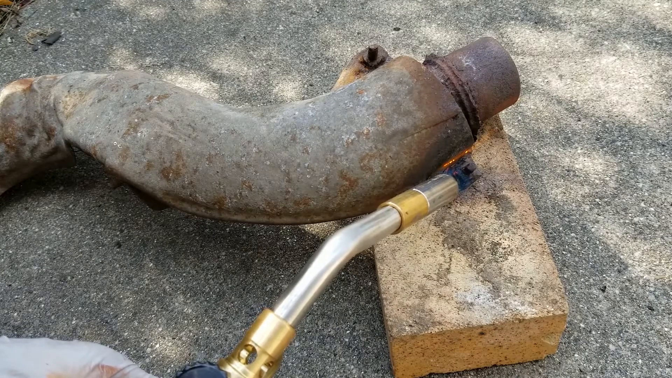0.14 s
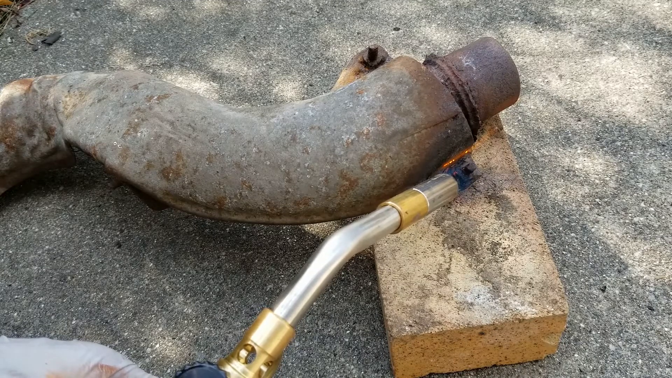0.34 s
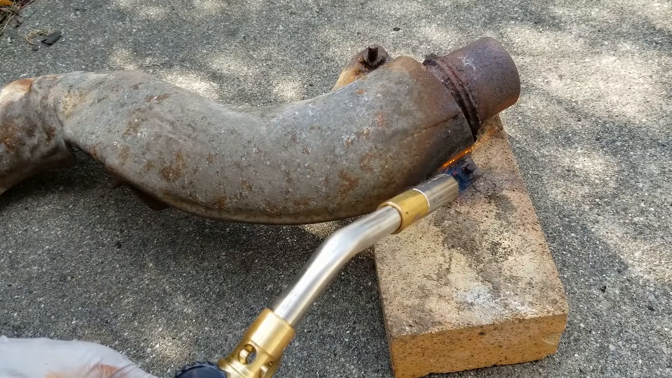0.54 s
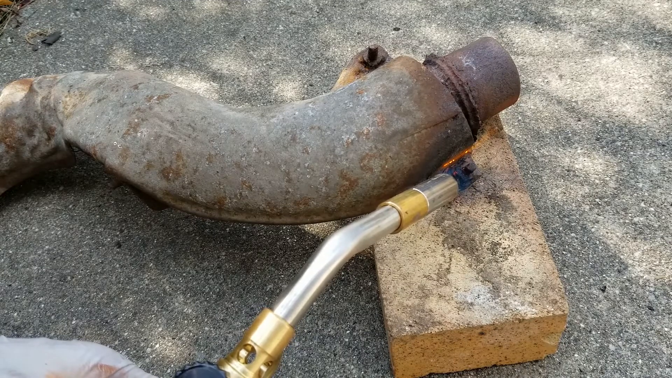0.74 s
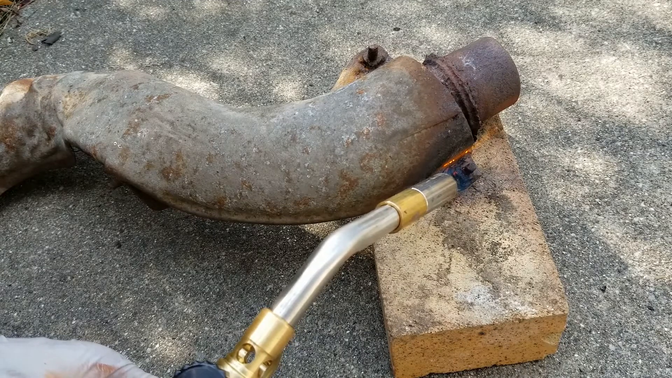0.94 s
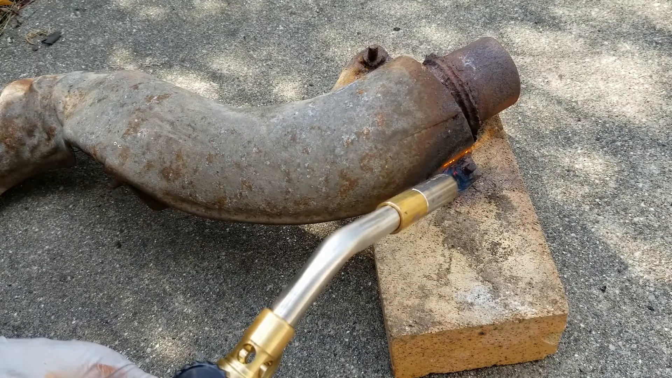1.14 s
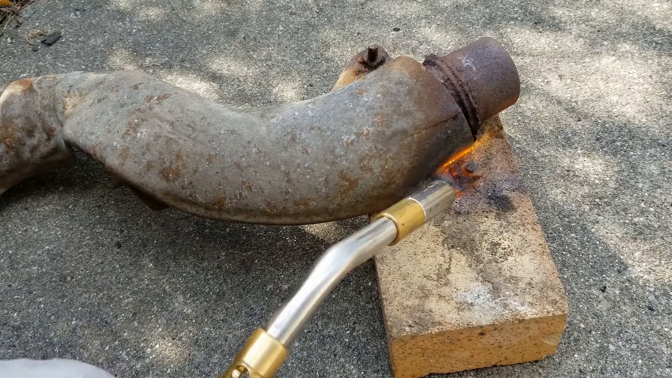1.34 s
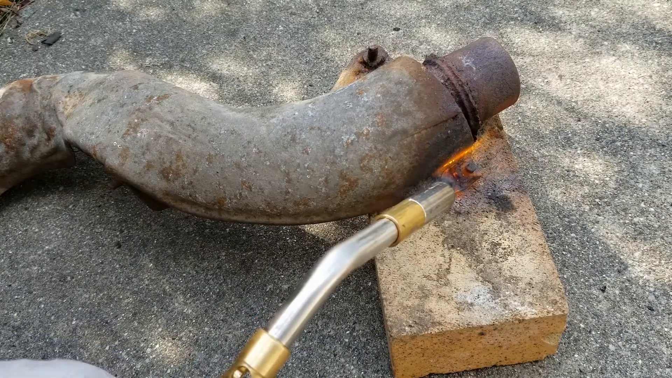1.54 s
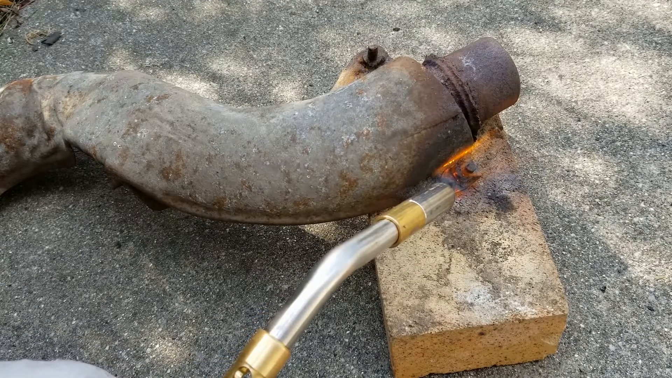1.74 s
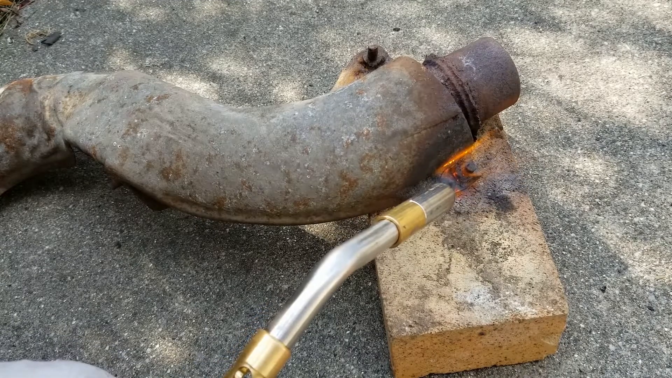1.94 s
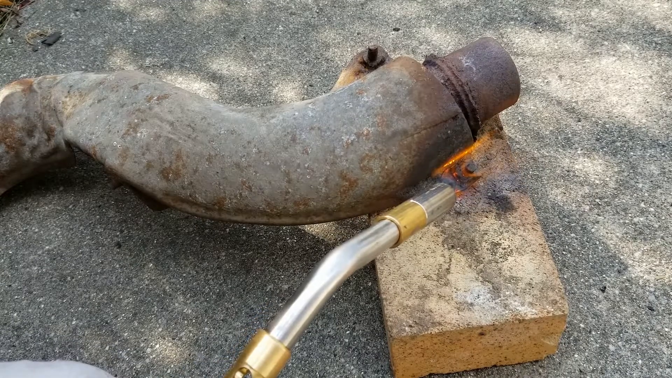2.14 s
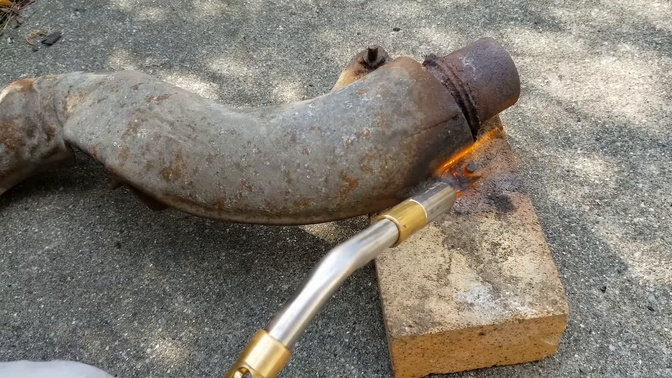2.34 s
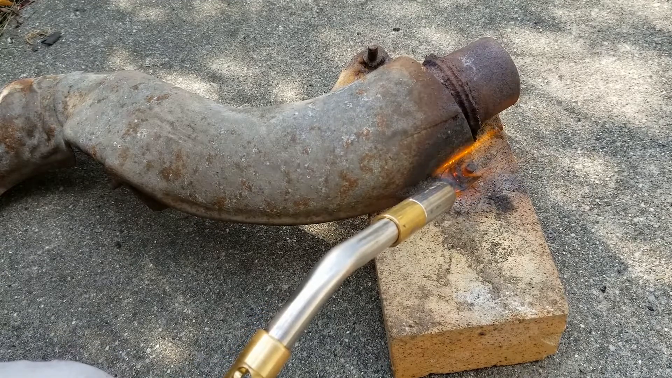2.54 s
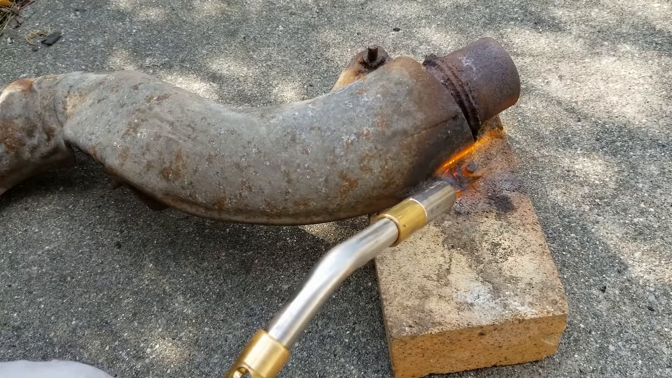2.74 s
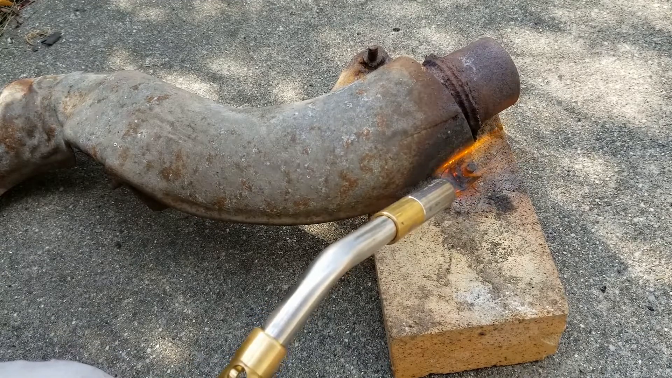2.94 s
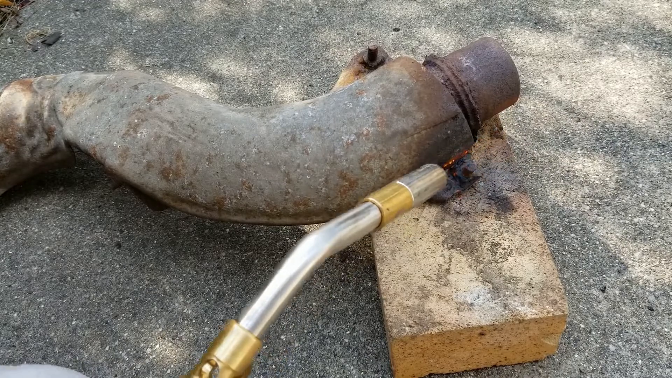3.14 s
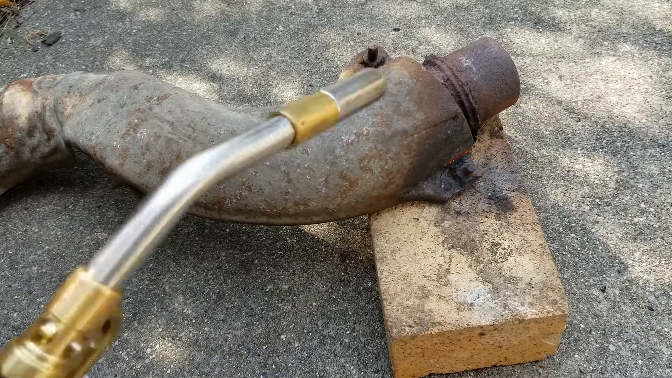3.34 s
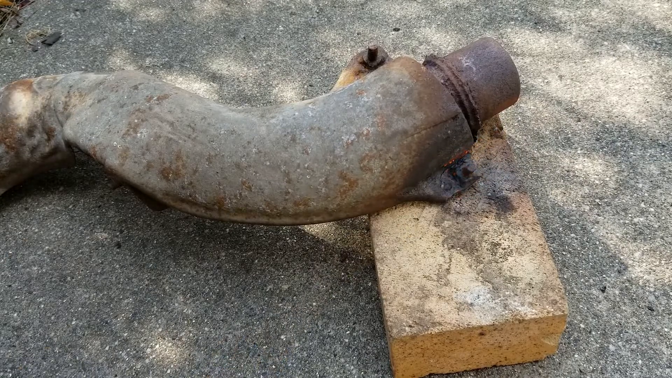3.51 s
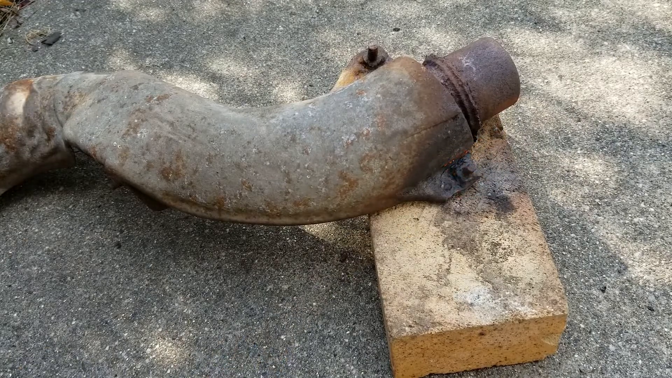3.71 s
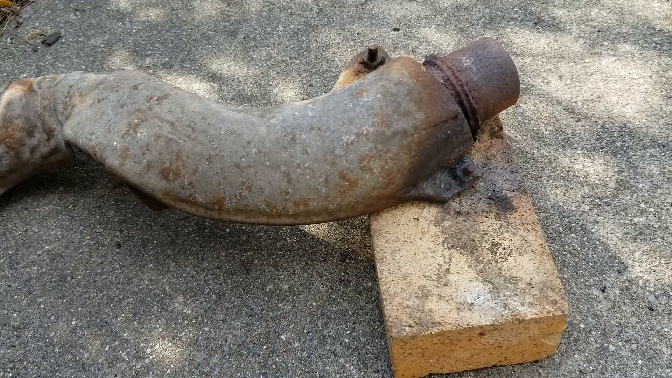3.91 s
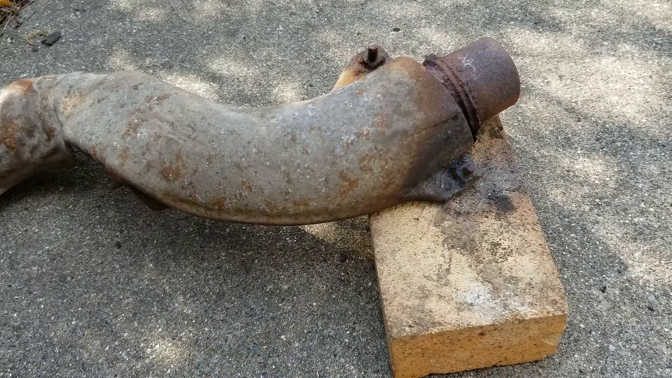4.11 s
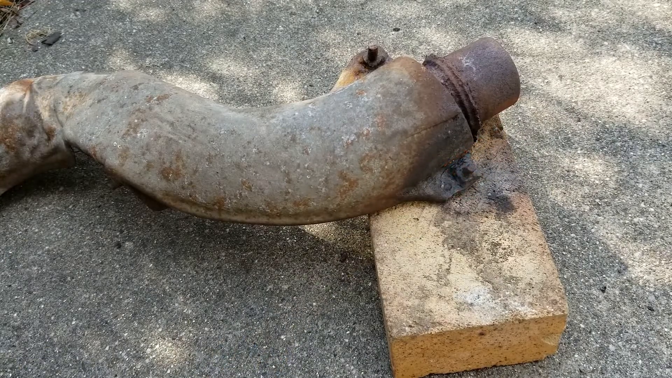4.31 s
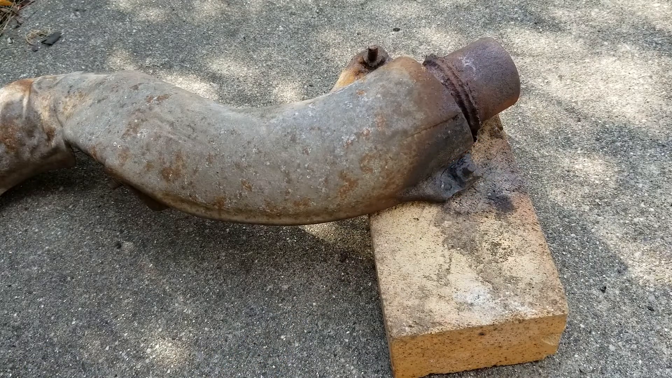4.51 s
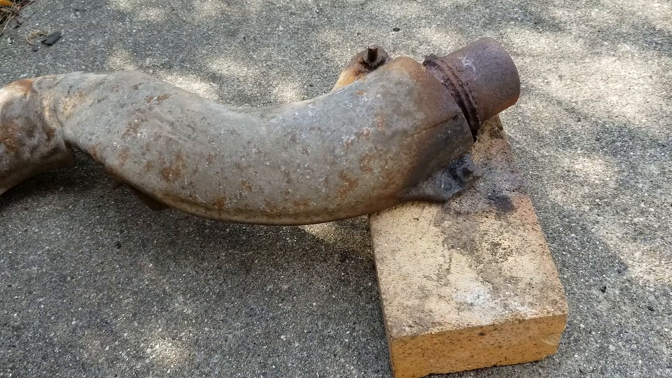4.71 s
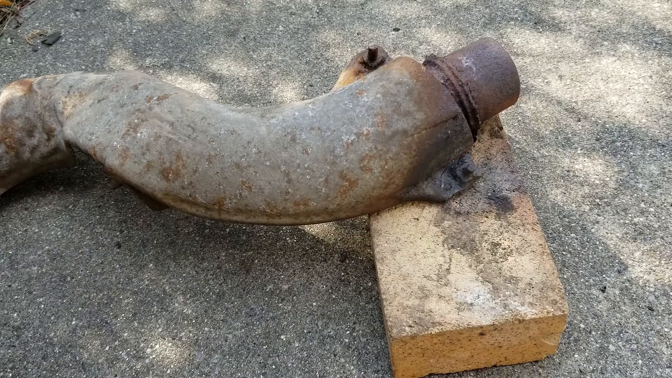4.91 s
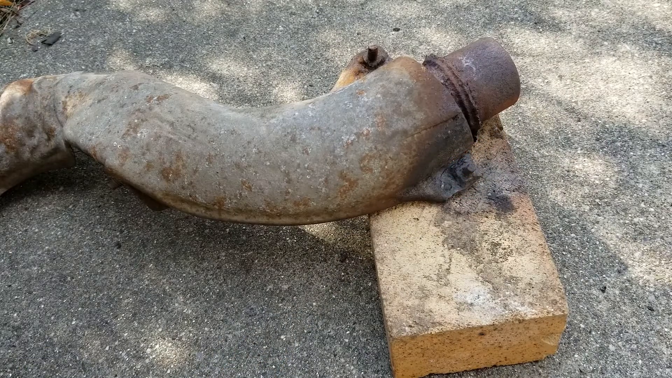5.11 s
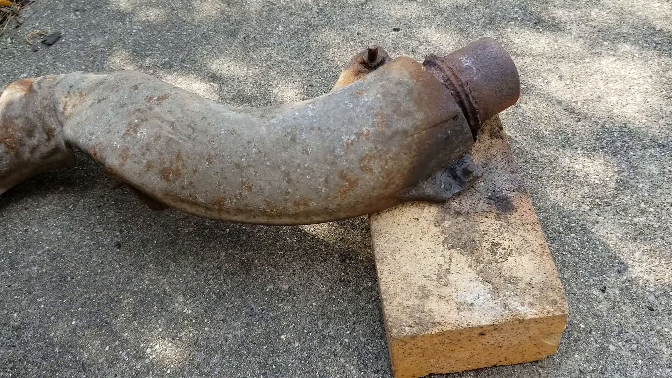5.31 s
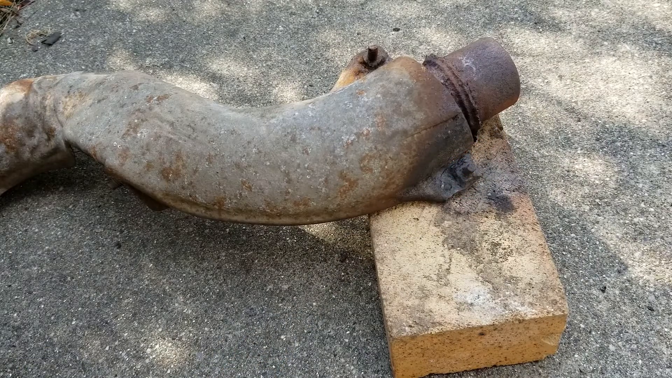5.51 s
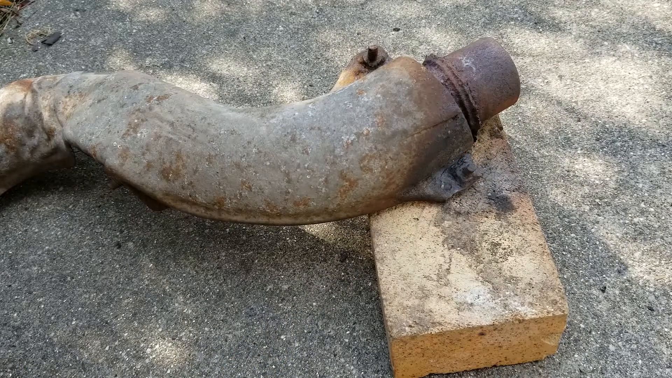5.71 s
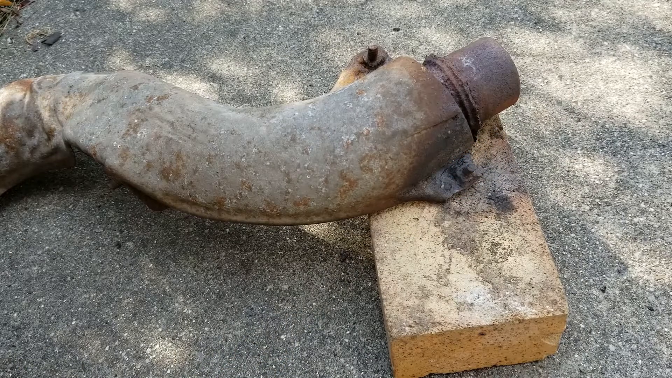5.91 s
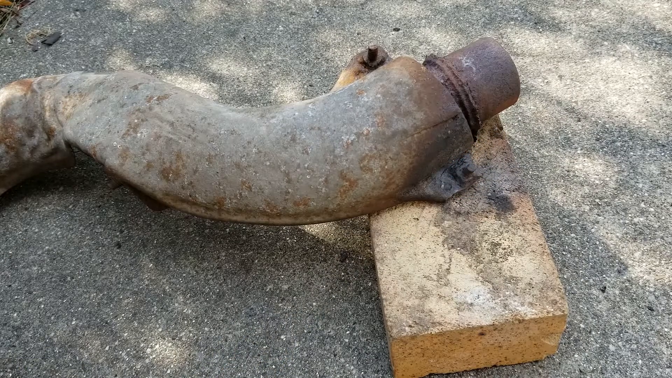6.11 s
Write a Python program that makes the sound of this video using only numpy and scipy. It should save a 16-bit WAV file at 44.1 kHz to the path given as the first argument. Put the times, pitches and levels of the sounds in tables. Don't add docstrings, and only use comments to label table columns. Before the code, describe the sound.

A loud, rushing torch flame fills the first three seconds, wavering slightly as it is moved against metal. It drops away abruptly with a plastic snap, a pop and short fluttering puffs. The sudden quiet of an open yard follows: low far traffic, machine hum, thin chirping insects, a sleeve brushing. Just after five seconds, metal knocks and rattles on concrete, and the background rises slightly toward the end.

```python
import sys
import numpy as np
from scipy import signal
from scipy.fft import rfft, irfft, next_fast_len
from scipy.io import wavfile
from scipy.ndimage import uniform_filter1d, map_coordinates

SR = 44100
rng = np.random.default_rng(int(sys.argv[2]) if len(sys.argv) > 2 else 0)


def field_ratio(decibels):
    return 10 ** (np.asarray(decibels, dtype=float) / 20)


def output_pcm(signal):
    pcm = np.clip(np.atleast_2d(signal).T, -1, 1) * 32767
    wavfile.write(sys.argv[1], SR, np.round(pcm).astype(np.int16))


N = 271207
T = np.arange(N) / SR

# time [s], camera gain [dB], hum [dB].
YARD = [(3.3, 2.5, -55), (3.7, -0.38, -55), (4.1, 1.5, -53.5), (4.45, 0.52, -57), (5.05, 2, -53.5),
        (5.3, 5.5, -51), (5.62, 7, -46), (5.9, 7.5, -45.5), (6.15, 8, -49)]
# frequency [Hz], left [dB], right [dB], likeness of the ports [0-1].
AIR = [(30, -29, -26, 1), (247, -10, -10.5, .9), (501.6, -23, -23, 0.27), (850, -23.5, -25.5, 0.17),
       (1250, -23, -29.5, .4), (1820, -16, -35.5, 0.38), (2340, -31, -38.5, 0.27), (3450, -40.5, -41, .2),
       (4070, -34, -41.5, .1), (6100, -36.5, -29, .3), (7150, -32.5, -38, .6), (10268, -40.5, -41.5, .8),
       (15900, -38, -39, .8)]
# frequency [Hz], lead of the left port [radians].
AIR_LEAD = [(1, 0), (700, 0), (1050, 2.8), (2200, 3.2), (2600, 0), (5300, 0), (5800, 3), (6300, 3),
            (6800, 0)]
# frequency [Hz], left [dB], right [dB], likeness [0-1].
TRAFFIC = [(25.04, -23, -24.5, .85), (49.7, 0, -3, 0.84), (120, 2, 2, 0.975), (209.6, -4, -6.5, 0.942),
           (326, -20.5, -20.5, 0.27), (501, -34.5, -34.5, .5)]
# time [s], level [dB], length [s].
GUSTS = [(.9, -52.5, 0.048), (2.12, -44.5, 0.042), (2.249, -41.5, .05), (2.78, -52.5, 0.056),
         (3.17, -45, 0.032), (3.43, -54.5, 0.047), (4.11, -57, 0.038), (4.78, -61.5, 0.0306),
         (5.629, -48.5, .04), (5.9, -49.5, 0.037), (5.96, -53.5, .06), (6.04, -56.5, 0.04),
         (6.13, -56, 0.039)]
# frequency [Hz], width [Hz], level [dB].
HUM = [(57.6, 22, 0.5), (119, 14, -7)]
# start [s], end [s], frequency [Hz], unsteadiness [Hz], level [dB].
WHINES = [(3.33, 3.78, 296, 9, -64.5), (4.75, 5.05, 297, 6, -70), (5.46, 5.62, 405, 25, -66),
          (5.7, 6.05, 412, 30, -66), (5.08, 5.26, 894, 16, -74), (5.33, 5.58, 894, 16, -72),
          (5.65, 5.9, 894, 12, -74), (5.37, 5.48, 1620, 150, -65), (4.6, 6.15, 6115, 9, -82),
          (3.4, 3.9, 6300, 40, -88), (4.4, 5.6, 7800, 20, -82), (4.2, 5.1, 7200, 6, -86),
          (5.52, 5.97, 9480, 60, -78), (5.5, 6.15, 8650, 80, -77), (4.45, 4.95, 6950, 10, -87),
          (4.8, 5.05, 11300, 700, -78), (3.98, 4.3, 11250, 1200, -79), (5.97, 6.15, 11000, 2000, -73)]
# frequency [Hz], left [dB], right [dB], likeness [0-1].
CHORUS = [(7500, -29.5, -26, .5), (8100, -10.5, -1.5, 0.49), (8790, -14.5, -0.5, .5), (9430, -13.5, -5, .4),
          (9868, -35, -28.5, 0.42)]
CHIRPS = [3.38, 3.62, 3.88, 4.075, 4.345, 4.61, 4.89, 5.16, 5.435, 5.715, 5.99]
# time [s], frequency [Hz], level [dB], length [s].
NEIGHBOURS = [(3.5, 8150, -75, .03), (3.61, 8814, -71.5, 0.041), (3.72, 9350, -80.5, .04),
              (3.841, 8906, -70, 0.11), (3.85, 9500, -75.5, .05), (4.08, 8900, -66, 0.061),
              (4.17, 9200, -71.5, .06), (4.24, 8300, -71.5, .05), (4.44, 8750, -71, 0.085),
              (4.61, 9430, -73, .05), (4.677, 8785, -71, 0.059), (4.73, 8670, -73.5, .06),
              (4.882, 8780, -74, 0.062), (4.92, 9500, -76.5, 0.031), (5.06, 9500, -76, 0.031),
              (5.341, 8240, -73.5, .06), (5.39, 8800, -74.5, 0.039), (5.54, 9500, -72.5, 0.031),
              (5.584, 8750, -67.5, 0.137), (5.6, 8070, -70.5, 0.065), (5.68, 9520, -70, .05),
              (5.779, 8570, -66.5, 0.051), (5.82, 9360, -67.5, .06), (5.93, 8080, -69.5, .05),
              (5.95, 8760, -65.5, 0.082), (6.0, 9300, -66, .05), (6.079, 8520, -66.5, .06)]
# peak time [s], level [dB], time to fall 18 dB [s].
RUSTLE = [(3.41, -64, 0.14), (3.916, -69.5, 0.06), (4.074, -62.5, 0.24), (4.12, -67, 0.23),
          (4.22, -71.5, 0.56), (4.3, -78.5, 0.17), (5.118, -78, 1.47), (5.39, -74.5, 0.12),
          (5.74, -79, 0.36), (6.04, -64, 1.5)]
# frequency [Hz], left [dB], right [dB], likeness [0-1].
CLOTH = [(1500, -30.5, -34.5, 0.303), (3000, -16.5, -22.5, 0.313), (7000, -15, -16, .4),
         (10320, -6, -11, 0.7042), (11300, -3.5, -11.5, 0.57), (13000, -6, -10.5, .7),
         (15800, -5.5, -17.5, .7)]
# time [s], peak [dB], brightness [dB], scattered tail [dB], ring length [0-1.5].
CLICKS = [(4.0544, -57, -2, 7.5, 0.65), (4.4244, -59, -4.5, -11.5, .5), (5.111, -35, -24, -1, .65),
          (5.1485, -52, -18, -1, 0.63), (5.1897, -31, -8.5, -4, 0.72), (5.2040, -43, -10.5, -2.5, .9),
          (5.2085, -50.5, 5.5, -1.5, 1.1), (5.236, -52, -7.5, -3, .7), (5.1255, -47, -20, -4, 0.68),
          (5.222, -48.5, -5, -2, 0.81), (5.3853, -47, -9.5, -3.5, 0.37)]
# time [s], peak [dB], brightness [dB], tail [dB], ring length [0-1.5].
TICKS = [
    (3.4594, -59.5, 1, -4.5, 0.493),
    (5.2703, -43, -12.5, 3, 0.48),
    (5.4048, -45, -1.5, -9.5, 0.255),
]
# time [s], peak [dB], brightness [dB], tail [dB], ring length [0-1.5].
SNAPS = [
    (3.2004, -28.5, -16.5, -12, 0.41),
    (3.2018, -35.5, 0, -10, 0.52),
]
# time [s], peak [dB], brightness [dB], tail [dB], ring length [0-1.5].
POP = [
    (3.2538, -37, -9, -10.5, 1.02),
]
# frequency [Hz], level [dB], 60 dB decay [s].
BODY = [(1520, -13, 0.063), (1741, 2, 0.0215), (2013, 2, 0.0237), (2390, -1.5, 0.018), (2869, -9, 0.0177),
        (3620, -16.5, 0.0065)]
# frequency [Hz], level [dB], 60 dB decay [s].
BRASS = [(4440, -3, 0.0124), (5780, -3.5, 0.0102), (6770, -2, 0.048), (8280, 0.5, 0.0215),
         (10370, -4, 0.031), (11880, -5.5, 0.031), (13900, -7, 0.0196), (15400, -4.5, .012)]
# frequency [Hz], level [dB], 60 dB decay [s].
LOOSE = [(1800, -7.5, .01), (2545, 1.5, 0.0122), (3010, 0.5, .014), (3580, -3.5, .01), (4600, -5, .008)]
# frequency [Hz], level [dB], 60 dB decay [s].
TRIGGER = [(1840, -2.5, 0.02), (2366, 0, 0.026), (3144, -1.5, 0.0144), (4102, -5, 0.017),
           (4590, -6, 0.0137)]
# frequency [Hz], level [dB], 60 dB decay [s].
SPRING = [(6530, -13, 0.0193), (8220, -1.5, 0.019), (9500, -5, 0.0142), (10990, -2.5, 0.0148),
          (12400, -5, 0.0203), (14700, 0.5, .013), (15360, 2.5, .009)]
# frequency [Hz], level [dB], 60 dB decay [s].
COLUMN = [(1790, -4, 0.0153), (2596, -2, 0.054), (3730, -2.5, 0.0234)]
# frequency [Hz], level [dB], 60 dB decay [s].
COLUMN_TOP = [(5210, 0, 0.022), (5800, -3, .015), (6330, -2, 0.0157), (8037, -12.5, .015),
              (14500, -14.5, .012)]
# time [s], level [dB], 60 dB decay [s].
THUDS = [
    (3.2007, -50.5, 0.026),
    (3.2538, -47.5, 0.0325),
    (3.2656, -43, 0.026),
    (3.2934, -44.5, 0.033),
    (5.111, -55.5, 0.113),
    (5.1893, -58.5, 0.059),
]
# time [s], level [dB], frequency [Hz], push 1 or pull -1.
PUSH = [(3.2543, -25, 159.4, -1), (3.2533, -37, 1110, 1), (3.2647, -35, 300, -1), (3.2684, -35.5, 130, -1),
        (3.2858, -40, 140, -1), (3.2948, -31.5, 130, 1)]
# time [s], frequency [Hz], level [dB].
SONG = [(3.2525, 1250, -59.5), (3.2545, 1263, -33), (3.261, 1277, -40.5), (3.267, 1350, -47),
        (3.272, 1374, -34.5), (3.283, 1327, -32.5), (3.291, 1294, -39), (3.296, 1410, -43),
        (3.305, 1340, -66.5)]
# frequency [Hz], unsteadiness [Hz], level [dB].
RETREAT = [(1740, 160, -43), (2422, 140, -44.5), (3720, 90, -57.5), (5035, 160, -51), (5930, 180, -54),
           (6750, 150, -53)]
RETREAT_S = 3.075, 3.1, 3.15, 3.157
# time [s], flame level [dB], jet level [dB].
GAS = [(0, -23, -37.5), (0.6, -23, -36.5), (1.32, -23.5, -37), (1.374, -20, -33.5), (1.41, -24, -35),
       (1.55, -24, -37.5), (1.9, -24.5, -37.5), (2.08, -27, -41.5), (2.25, -25.5, -40), (2.454, -25, -36.5),
       (2.76, -25.5, -37.5), (2.85, -27, -42), (2.95, -28.5, -43), (3.0, -26, -40.5), (3.068, -25.5, -41)]
# frequency [Hz], left [dB], right [dB], likeness [0-1].
ROAR = [(39.82, -23.5, -25.5, .6), (128, -8, -7.5, 1), (255, -3.5, -5, 0.9674), (520, -8.5, -5.5, 0.94),
        (820, -6, -3.5, 0.97), (1166.2, -7, -10.5, 0.92), (1420, -5.5, -9.5, 0.94), (1910, -4, -2.5, 0.94),
        (2319.3, -1, -3.5, 0.86), (2427, -13, -8.5, 0.73), (2610, -15.5, -6.5, 0.971),
        (3078, -20, -12.5, .75), (3196, -25.5, -14.5, .3), (3301.4, -18.5, -13, 0.53)]
# frequency [Hz], left [dB], right [dB], likeness [0-1].
HISS_LOW = [(3102, -8, -0.5, 0.75), (4003, -6, -9, 0.93), (4790, -7.5, -5, 0.58), (6210, -23.5, -7, 0.18),
            (6940, -25, -19, 0.52), (7710, -14.5, -12.5, 0.87), (8010, -12.5, -8, 0.987),
            (8604, -22, -14, 0.74), (9300, -15.5, -12, 0.833), (10440, -11.5, -15.5, 0.63),
            (11886, -23, -22, 0.43), (12920, -15, -20.5, 0.22), (13936, -22, -23, 0.739),
            (15684, -16.5, -17.5, 0.62)]
# frequency [Hz], left [dB], right [dB], likeness [0-1].
HISS_MID = [(3133, -5.5, -4.5, 0.41), (3532, 1, -3, 0.76), (4131, -7, -8, 0.59), (4800, -8.5, -3.5, 0.83),
            (5660, -9.5, -11.5, 0.16), (6550, -17, -7, 0.41), (7094, -17, -12.0, 0.501),
            (7597, -12.5, -9, 0.76), (8300, -18.5, -12.0, 0.62), (9200, -15.5, -7, 1),
            (11305, -17.5, -19.5, 0.6), (12937, -16, -15, 0.71), (13780, -16.5, -18.5, 0.73),
            (15743, -15.5, -15, 0.55)]
# frequency [Hz], left [dB], right [dB], likeness [0-1].
HISS_HIGH = [(3212, -4, -5.5, 0.55), (4090, -8, -9.5, 0.61), (5070, -6, -7, 0.57), (5508, -10, -6.5, 0.68),
             (6145, -17, -7, 0.31), (7240, -21, -12.5, 0.13), (8200, -14.5, -10, 0.79),
             (8792, -20, -12.5, 0.78), (9470, -13.5, -10.5, 0.79), (9900, -15.5, -16.5, 0.52),
             (11710, -17, -22, 0.36), (13200, -14.5, -14, 0.5), (13950, -16.5, -18.5, 0.7),
             (15700, -13.5, -16.5, 0.46)]
# time [s], place between the three ways [0-2].
POSE = [(0, 0.21), (1.33, 0.07), (1.42, 1), (2.05, 1), (2.3, 2), (2.88, 2.154), (2.97, 1.3)]
# frequency [Hz], lead of the left port [radians].
TORCH_LEAD = [(1, 0), (200, -.02), (430, -.35), (800, .1), (1120, .15), (1550, -.9), (1980, -.8),
              (2500, -1.4), (3050, -1.4), (3270, .7), (4050, -1.3), (4480, -2.2), (5340, -3.3),
              (7300, -6.28)]
# frequency [Hz], width [Hz], boost [dB].
TUBE = [(196, 73, 2), (411, 45, 1.5), (819.1, 43.3, 3.5), (1274, 89, 3.5), (1755.8, 63, 5),
        (2145.4, 110, 3), (2608, 63, 2.5), (2947.5, 60, 3.5), (3682, 47, 3.5), (4298, 61, 1.5),
        (4821, 110, 4.5), (6570, 35, 2.5), (7705, 130, 4)]
# time [s], share [0-1], delay [ms].
BOUNCE = [(2.1, 0, 0.417), (2.3, .3, 0.424), (2.75, .3, .39), (2.85, 0, 0.422)]
# roar, rumble, hiss, fizz [dB/s].
SAG_DB_PER_S = [135, 150, 110, 250]


def unit(x):
    return x / np.sqrt(np.mean(x ** 2) + 1e-20)


def curves(rows):
    s, *cols = np.transpose(rows)
    return [np.interp(T, s, c) for c in cols]


def wobble(rate):
    return map_coordinates(rng.standard_normal(int(N * rate / SR) + 4), [np.arange(N) * rate / SR])


def filtered(x, order, hz, kind="band"):
    return signal.lfilter(*signal.butter(order, hz, kind, fs=SR), x)


def wavering(hz, rate, depth):
    return np.sin(2 * np.pi * hz * T + depth * wobble(rate))


def patchy(depth_db):
    z = signal.stft(rng.standard_normal((2, N)), nperseg=512)[2]
    field = uniform_filter1d(rng.standard_normal(z.shape[1:]), size=6, axis=0)
    field = uniform_filter1d(field, size=12, axis=1)
    return signal.istft(z * field_ratio(depth_db * unit(field)), nperseg=512)[1][:, :N]


def ports(pair, table, lead=((1, 0),), edge_db=-120):
    m = next_fast_len(N + 8192)
    hz = np.fft.rfftfreq(m, 1 / SR)
    f, left, right, alike = np.transpose(table)

    def read(v, **ends):
        return np.interp(np.log(hz + 1), np.log(f + 1), v, **ends)

    gain = field_ratio(np.array([read(v, left=edge_db, right=edge_db) for v in (left, right)]))
    turn = np.arccos(np.clip(read(alike), 0, 1) ** 0.898) / 2
    twist = np.exp(.5j * np.interp(hz, *np.transpose(lead)))
    shared, unshared = rfft(pair, m) * [np.cos(turn), np.sin(turn)]
    out = irfft(gain * [(shared + unshared) * twist, (shared - unshared) / twist], m)[:, :N]
    return out / np.sqrt(np.mean(out.mean(0) ** 2))


def split(x, hz):
    low = signal.sosfiltfilt(signal.butter(2, hz, fs=SR, output="sos"), x)
    high = x - low
    return low / low.mean(0).std(), high / high.mean(0).std()


def breeze():
    strength = sum(field_ratio(db) * np.exp(-((T - s) / length) ** 2) for s, db, length in GUSTS)
    lumps = unit(filtered(rng.standard_normal(N), 2, [30, 90]))
    return strength * lumps * [[1], [-.3]]


def machines(hum_db):
    hum = sum(field_ratio(db + 2.9 * wobble(width)) * wavering(hz, width, 0.82) for hz, width, db in HUM)
    whine = 0
    for start, end, hz, width, db in WHINES:
        fade = np.clip(np.minimum(T - start, end - T + 0.0376) / 0.069, 0, 1)
        whine = whine + fade * field_ratio(db + 3 + 1.8 * wobble(width)) * wavering(hz, width, .8)
    return field_ratio(hum_db + 3.5) * hum + whine


def crickets(gain_db):
    def burst(u):
        return np.clip(np.sin(np.pi * np.clip(u / 0.0467, 0, 1)), 0, 1)

    chirp = field_ratio(gain_db - 69) * sum(burst(T - s) + 0.84 * burst(T - s - .03) for s in CHIRPS)
    strokes = 1 + 0.68 * wavering(110, 20, 1.6)
    near = chirp * strokes * wavering(7840, 300, .8)
    scrape_db, waver = .4 + 3.6 * wobble(150), 1.15 * wobble(400)
    others = 0
    for s, hz, db, length in NEIGHBOURS:
        swell = np.exp(-(2 * (T - s) / length) ** 4)
        others = others + field_ratio(db) * swell * np.sin(2 * np.pi * hz * T + waver)
    others = field_ratio(scrape_db) * others
    chorus_db = -72.5 + .9 * gain_db + .8 * wobble(5) + 2.1 * wobble(120)
    chorus = field_ratio(chorus_db) * ports(patchy(2.9), CHORUS)
    return near * field_ratio([[-.6], [.6]]) + others * field_ratio([[-4], [2.5]]) + chorus


def sleeve():
    rise_db_per_s, rest_db = 261.5, -88
    strength = field_ratio(rest_db)
    for s, db, fall_s in RUSTLE:
        drop_db = np.where(T < s, rise_db_per_s * (s - T), 18 * (T - s) / fall_s)
        strength = strength + field_ratio(db - drop_db)
    return strength * field_ratio(1.5 * wobble(200)) * ports(patchy(2.5), CLOTH)


def yard():
    gain_db, hum_db = curves(YARD)
    traffic = field_ratio(-55 + 0.77 * gain_db + 1.3 * wobble(4)) * ports(patchy(1.8), TRAFFIC)
    murmur, leaves = split(ports(patchy(1.2), AIR, AIR_LEAD), 2400)
    air = field_ratio(-64 + gain_db) * murmur + field_ratio(-74 + 0.69 * gain_db) * leaves
    return air + traffic + machines(hum_db) + sleeve() + crickets(gain_db)


def thuds():
    strength = 0
    for s, db, t60 in THUDS:
        onset = np.clip((T - s) / 0.0014, 0, 1)
        strength = strength + field_ratio(db - 60 * np.clip(T - s, 0, 1) / t60) * onset
    return strength * unit(filtered(rng.standard_normal(N), 2, [450, 1300]))


def ring(modes, t, rate):
    out = 0
    for hz, db, t60 in modes:
        rough = 1.14 * np.tanh(t / 0.0026) * map_coordinates(rng.standard_normal(800), [t * rate])
        out = out + field_ratio(db + rng.normal(0, 1.53) - 60 * t / t60) * np.sin(2 * np.pi * hz * t + rough)
    return out


def scatter(hit, t, tail_db):
    echo = rng.standard_normal((2, len(t)))
    echo = echo * field_ratio(2.94 * map_coordinates(rng.standard_normal(64), [t * 120]))
    tail = 2.42 * filtered(echo, 1, 6000, "high") + 2.06 * filtered(echo, 1, [1500, 3200])
    tail = tail * field_ratio(-60 * t / 0.29) * (t > .006)
    grit = field_ratio(-60 * t / 0.0106) * filtered(rng.standard_normal(len(t)), 2, [1900, 3200])
    wet = signal.fftconvolve(hit[None] + 4 * grit, tail / np.linalg.norm(tail[0]), axes=1)
    return field_ratio(tail_db - 4.0) * wet[:, :len(t)]


def contact(t, bright_db, length, crack_db, body, top):
    crack = filtered(rng.standard_normal(len(t)), 1, [2000, 9000])
    crack = field_ratio(crack_db - 60 * t / (.015 * length)) * crack
    damping = field_ratio(-60 * t * (1 / length - 1) / 0.0327)
    hit = damping * ring(body, t, rate=536) + field_ratio(bright_db) * damping * ring(top, t, rate=1520)
    hit = (hit + field_ratio(.6 * bright_db) * crack) * (1 - np.exp(-t / 0.00044))
    return signal.sosfilt(signal.butter(4, 1450, "high", fs=SR, output="sos"), hit)


def clicks():
    out, t = np.zeros((2, N + SR)), np.arange(SR // 4) / SR
    struck = [(CLICKS, BODY, BRASS), (TICKS, LOOSE, BRASS), (SNAPS, TRIGGER, SPRING), (POP, COLUMN, COLUMN_TOP)]
    for rows, body, top in struck:
        for s, db, bright_db, tail_db, length in rows:
            pan_db, crack_db = (-5.5, -5.5) if s < 3.7 else (4.5, -11)
            hit = contact(t, bright_db, length, crack_db, body, top)
            heard = hit + scatter(hit, t, tail_db)
            far = int(pan_db > 0)
            heard[far] = np.pad(heard[far], (1, 0))[:len(t)]
            pan = np.array([[pan_db], [-pan_db]]) / 2
            out[:, round(s * SR):][:, :len(t)] += field_ratio(db - 2.5 + pan) * heard
    return out[:, :N]


def flashback():
    hz, db = curves(SONG)
    start_s, end_s = SONG[0][0], SONG[-1][0]
    over_db = np.clip(-8.5 - 1600 * (T - start_s), -46.5, 0)
    phase = 2 * np.pi * np.cumsum(hz) / SR
    overtones = np.sin(2 * phase) + 0.63 * np.sin(3 * phase)
    out = field_ratio(db) * (T > start_s) * (T < end_s) * (np.sin(phase) + field_ratio(over_db) * overtones)
    for s, level_db, puff_hz, sign in PUSH:
        u = np.clip(T - s, 0, None) * puff_hz
        shape = np.exp(-.3 * u - 0.86 * u ** 3) * np.tanh(6 * u)
        out = out + sign * field_ratio(level_db + 5.5) * np.sin(2 * np.pi * u) * shape
    return out


def retreat():
    lines = sum(field_ratio(db + 3.5 + 3.4 * wobble(width)) * wavering(hz, width, 1.26) for hz, width, db in RETREAT)
    return lines * np.interp(T, RETREAT_S, [0, 1, .4, 0.0])


def valve():
    shut_s, snuff_s, silent_s = 3.0686, 3.15, 3.33
    snuff_db = [-16, -9.5, -8.5, -2]

    def ramp(s, length):
        return np.clip((T - s) / length, 0, 1)

    loss_db = -np.outer(SAG_DB_PER_S, np.clip(T - shut_s, 0, snuff_s - shut_s))
    loss_db = loss_db + np.outer(snuff_db, ramp(snuff_s, 0.0064))
    loss_db[0] += -6 * ramp(shut_s, 0.013)
    return field_ratio(loss_db - 139.5 * np.clip(T - snuff_s, 0, 1)) * (T < silent_s)


def resonant(x):
    m = next_fast_len(N)
    hz = np.fft.rfftfreq(m, 1 / SR)
    lift_db = sum(db / (1 + (2 * (hz - centre_hz) / width) ** 2) for centre_hz, width, db in TUBE)
    return irfft(rfft(x, m) * field_ratio(lift_db), m)[:, :N]


def bounced(x):
    share, delay_ms = curves(BOUNCE)
    late = np.arange(N) - delay_ms * SR / 1000
    echo = np.array([map_coordinates(v, [late]) for v in x])
    return (x - share * echo) / np.sqrt(1 + share ** 2)


def flame(puffs_per_s=2500, share=0.417):
    roar_db, hiss_db = curves(GAS)
    rumble_db = -27 + 0.27 * (roar_db + 23)
    fizz_db = -38 + .75 * (hiss_db + 37) + 0.66 * wobble(6)
    pockets = -rng.exponential(size=N) ** 0.684 * (rng.random(N) < puffs_per_s / SR)
    source = patchy(0.72) * field_ratio(0.37 * wobble(70))
    source[0] = np.sqrt(1 - share) * source[0] + np.sqrt(share) * unit(pockets - pockets.mean())
    rumble, roar = split(ports(resonant(source), ROAR, TORCH_LEAD), 1150)
    jet = bounced(resonant(patchy(1.3) * field_ratio(0.67 * wobble(150))))
    pose, = curves(POSE)
    held = 0
    for k, table in enumerate((HISS_LOW, HISS_MID, HISS_HIGH)):
        held = held + np.clip(1 - abs(pose - k), 0, 1) * ports(jet, table, TORCH_LEAD)
    hiss, fizz = split(held, 7000)
    gains = field_ratio([roar_db + 0.52 * wobble(12), rumble_db, hiss_db, fizz_db]) * valve()
    return sum(gain * layer for gain, layer in zip(gains, (roar, rumble, hiss, fizz)))


def scene():
    return breeze() + yard() + thuds() + clicks() + flashback() + retreat() + flame()


def top_cut(x):
    return signal.sosfilt(signal.butter(12, 16980, fs=SR, output="sos"), x)


def record(dry):
    return top_cut(dry)


dry = scene()
out = record(dry)
output_pcm(out)
```